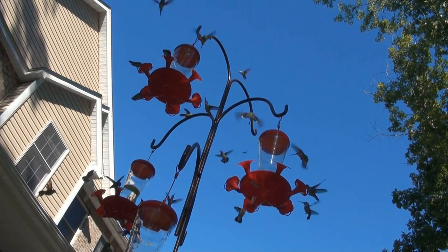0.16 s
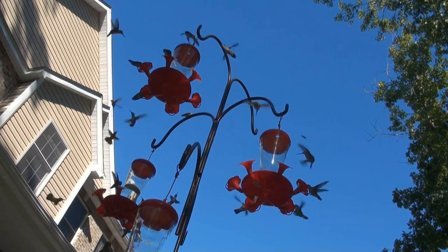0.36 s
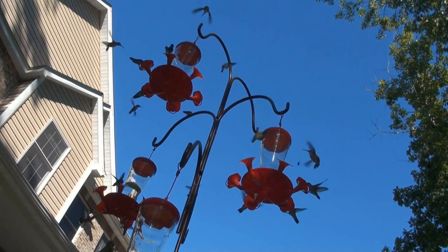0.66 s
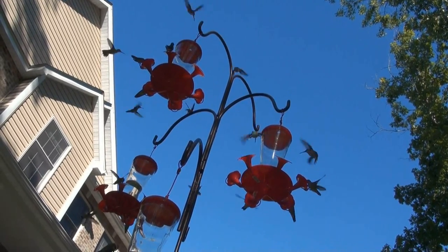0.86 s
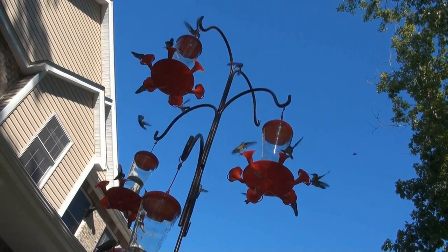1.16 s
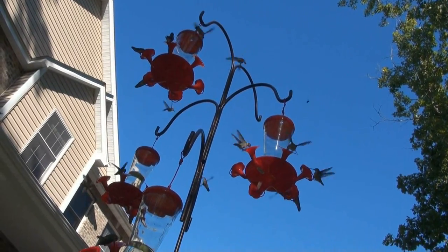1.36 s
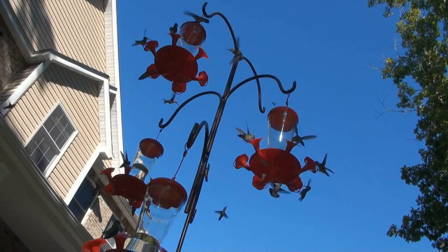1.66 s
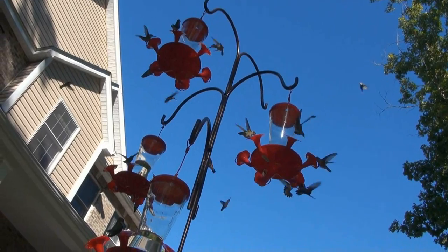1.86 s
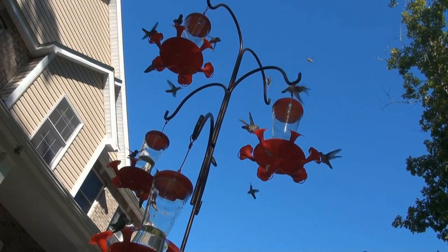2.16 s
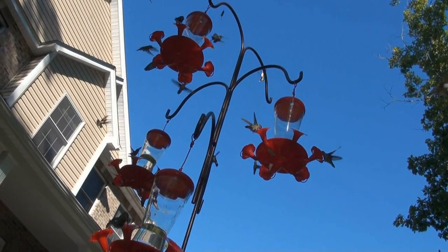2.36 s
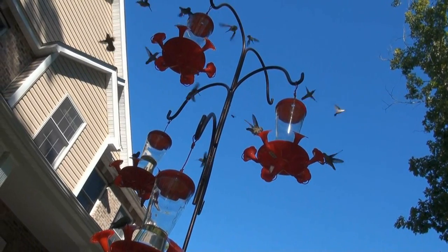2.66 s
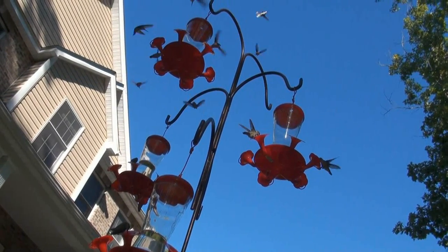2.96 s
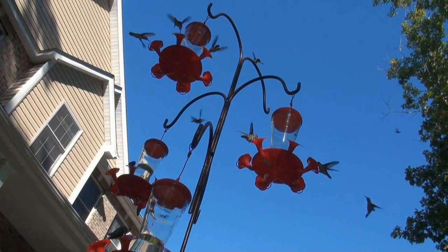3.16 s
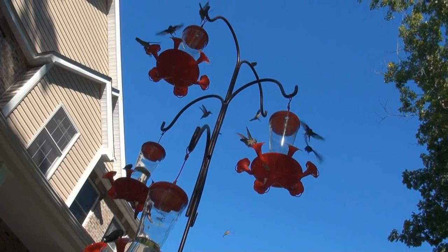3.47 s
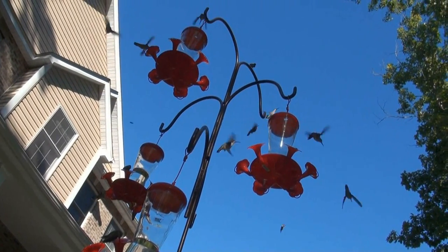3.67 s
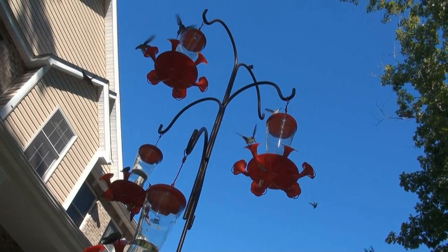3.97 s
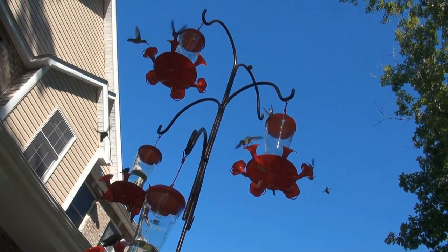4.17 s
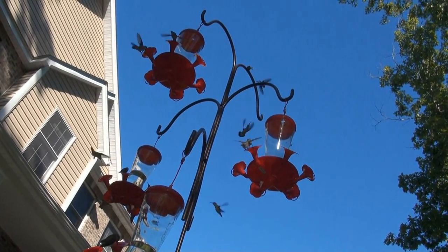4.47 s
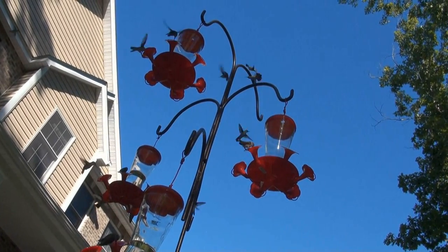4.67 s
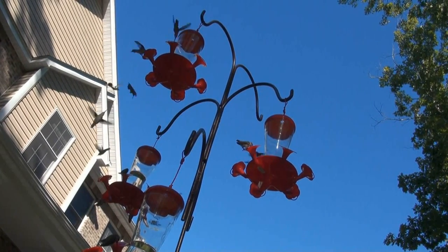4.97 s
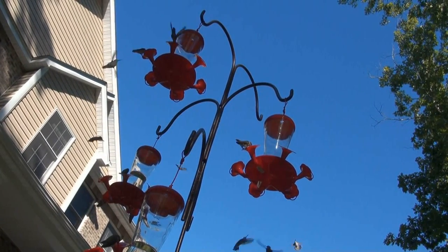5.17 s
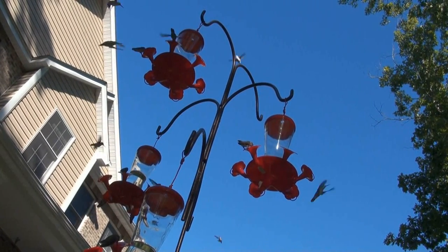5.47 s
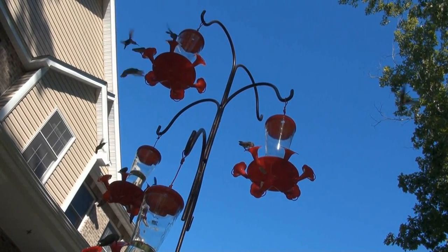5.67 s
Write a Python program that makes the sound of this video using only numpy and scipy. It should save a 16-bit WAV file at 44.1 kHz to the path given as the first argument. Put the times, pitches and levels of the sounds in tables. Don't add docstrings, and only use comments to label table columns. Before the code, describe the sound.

A crowd of hummingbirds flits around feeders outdoors near a house, heard by a stereo microphone a few metres below. Throughout, soft leafy hiss, a fine high insect shimmer and a low throbbing wing hum continue, with brief swells as birds whirr past. Small falling chips begin at once, with a thin whistle at 0.3 s and a short trill at 0.5 s. From 0.9 to 1.3 s whistles, a rapid bright trill and harsh buzzy rasps crowd together. Clear whistles return at 2.0-2.3 s, a sharp rasp at 2.5 s and the most piercing rising squeak at 2.75 s, among dry beak and feather ticks. Chips and short trills continue around 3 s; a faint far caw sounds at 3.35 s. Trills and whistles cluster at 3.7-4.2 s. Afterward calls thin: chips, small rasps, a trill at 4.7 s, a clear chip at 5.26 s, then mostly hum and insects until about 5.8 s.

```python
import sys
import numpy as np
from scipy import signal
from scipy.fft import rfft, irfft
from scipy.io import wavfile
from scipy.ndimage import uniform_filter1d

SR = 44100
rng = np.random.default_rng(int(sys.argv[2]) if len(sys.argv) > 2 else 0)


def store_pcm(level_fs):
    pcm = np.round(np.clip(level_fs, -1, 1) * 32767).astype(np.int16)
    wavfile.write(sys.argv[1], SR, np.atleast_2d(pcm).T)


def ratio_of_db(decibels):
    return 10 ** (np.asarray(decibels, float) / 20)


N = 256662

LEFT_LAG = 1
COARSE = 16
SIDES = np.array([[1], [-1]])


def level(x, db):
    return x * ratio_of_db(db) / np.sqrt(np.mean(x ** 2))


def colour(x, points):
    hz, db = np.transpose(points)
    bins_hz = np.arange(N // 2 + 1) * SR / N + 1
    gain = ratio_of_db(np.interp(np.log(bins_hz), np.log(hz), db))
    return irfft(rfft(x) * gain, N)


def ring(x, hz, width):
    return signal.lfilter(*signal.iirpeak(hz, hz / width, SR), x)


def muffle(x):
    return signal.sosfilt(signal.ellip(6, 1, 40, 13400, fs=SR, output="sos"), x)


def walk(rate, size=N):
    hold = int(SR / rate)
    steps = np.repeat(rng.standard_normal(size // hold + 1), hold)
    return 1.3 * uniform_filter1d(uniform_filter1d(steps, hold), hold)[:size]


def clock(length):
    return np.arange(int(length * SR)) / SR


def swell(t, rise, fall):
    return np.sin(np.pi / 2 * np.clip(np.minimum(t / rise, (t[-1] - t) / fall), 0, 1)) ** 2


def add(out, start, sound, pan_db):
    for side, sign in enumerate((1, -1)):
        i = int(start * SR) + LEFT_LAG * (side == 0)
        out[side, i:i + len(sound)] += sound * ratio_of_db(sign * pan_db / 2)


def air():
    # frequency in Hz, level in dB per Hz.
    hiss = [(30, 1), (65, -9), (300, -3), (650, -1.5), (2200, -7), (8000, -11), (12500, -11.5),
            (16000, -19.5)]
    # frequency in Hz, side minus middle in dB.
    hiss_width = [(40, -7), (120, -5), (400, 0), (1000, 2.5), (4000, 1), (10000, 1), (15000, -22)]
    mid = colour(rng.standard_normal(N), hiss) * ratio_of_db(0.12 * walk(4.35))
    side = colour(colour(rng.standard_normal(N), hiss), hiss_width) * ratio_of_db(0.27 * walk(2.4))
    return level(np.array([mid + side, mid - side]), -55)


def insects():
    # centre in Hz, width in Hz, level in dB.
    modes = [(7600, 500, -57), (7856, 220, -66), (7500, 1050, -69)]
    shared, pan_db = 0.5, -1
    common, left, right = rng.standard_normal((3, N))
    together = np.array([np.roll(common, LEFT_LAG), common])
    song = np.sqrt(shared) * together + np.sqrt(1 - shared) * np.array([left, right])
    scrapes = song * ratio_of_db(2.0 * walk(190) + 0.8 * walk(6))
    chorus = 0
    for hz, width, db in modes:
        width = 1.37 * width
        chorus = chorus + level(ring(ring(scrapes, hz, width), hz, width), db)
    return chorus * ratio_of_db(pan_db / 2 * SIDES)


def port_lag(k):
    return 1.25 / 2 * (1 - np.exp(-(k - 1) / 2.6)) * SIDES


def passes(t):
    # start in seconds, length in seconds, level in dB,
    # stroke tone in Hz (twice the beat rate).
    close_birds = [(0.019, 0.044, -47.5, 109), (0.105, 0.058, -49, 98.9), (0.19, 0.055, -49, 107.8),
                   (0.287, 0.099, -47.5, 105.2), (0.588, 0.26, -47, 105.2), (1.03, 0.11, -49, 103.6),
                   (1.344, 0.054, -48, 114.1), (1.599, 0.063, -46.5, 107), (1.988, 0.047, -47.5, 106.1),
                   (2.126, 0.056, -46, 104.1), (2.429, 0.031, -51, 106.6), (2.781, 0.045, -50, 96.4),
                   (2.857, 0.15, -48.5, 104.1), (3.045, 0.035, -48.5, 97.8), (3.14, 0.098, -48, 108.2),
                   (3.315, 0.04, -55, 103.5), (3.496, 0.08, -47, 107.1), (3.626, 0.029, -47, 110.3),
                   (3.688, 0.053, -43.5, 112), (3.832, 0.056, -44.5, 114.7), (3.938, 0.034, -50, 106.4),
                   (4.003, 0.055, -50, 96.6), (4.389, 0.076, -49, 101.8), (4.537, 0.032, -49, 99.9),
                   (4.63, 0.055, -46, 103.7), (4.84, 0.083, -49, 113.9), (5.02, 0.21, -47.5, 96.2),
                   (5.362, 0.07, -45.5, 109.9), (5.496, 0.088, -47.5, 94.6)]
    edge_s = 0.022
    s, length, db, tone_hz = np.transpose(close_birds)[:, :, None]
    glide_hz = np.interp(t, (s + length / 2)[:, 0], tone_hz[:, 0])
    stroke = 2 * np.pi * np.cumsum(glide_hz) * COARSE / SR
    inside = np.clip(np.minimum(t - s, s + length - t) / edge_s + 0.5, 0, 1)
    loudness = np.sum(ratio_of_db(db) * np.sin(np.pi / 2 * inside) ** 2, axis=0)
    return np.sqrt(2) * loudness * np.sin(stroke - port_lag(1.97))


def wings():
    harmonics_db = [-18.5, -3, -12, -9.5, -15, -12.5, -11.5, -9.5, -13.5, -18.5, -23]
    # time in seconds, level in dB.
    flock_levels = [(0.0, -56), (0.11, -58.5), (0.29, -52), (0.39, -57.5), (1.1, -55.5), (2.09, -59.5),
                    (2.12, -53.5), (2.35, -57.5), (3.65, -56), (3.68, -53.5), (4.18, -58.5), (4.94, -55.5),
                    (5.35, -58.5), (5.82, -59)]
    t = np.arange(N // COARSE + 1) * COARSE / SR
    near = passes(t)
    flock = 0
    for beat_hz in np.linspace(45, 59, 24):
        drift, nearness, place = (walk(rate * COARSE, len(t)) for rate in (4, 4, 1))
        turn = 2 * np.pi * np.cumsum(beat_hz * (1 + 0.03 * drift)) * COARSE / SR
        late = 2 * np.pi * beat_hz * 0.00004 * place * SIDES
        phases = rng.uniform(0, 2 * np.pi, len(harmonics_db))
        bird = 0
        for k, (db, phase) in enumerate(zip(harmonics_db, phases), 1):
            bird = bird + ratio_of_db(db) * np.sin(k * (turn + late) + phase - port_lag(k))
        flock = flock + bird * ratio_of_db(3.8 * nearness + 0.52 * place * SIDES)
    flock = level(flock, 4.16) * ratio_of_db(np.interp(t, *np.transpose(flock_levels)))
    hum = near * ratio_of_db(-2 - 0.4 * SIDES) + flock
    return signal.resample_poly(hum, COARSE, 1, axis=1)[:, :N]


def far_chips():
    count, low_db, high_db, scatter_db = 45, -74, -69, 2.5
    when, pitch, side = rng.random((count, 3)).T
    near = scatter_db * rng.standard_normal(count)
    return list(zip(0.02 + 5.7 * when, 1850 * 2 ** pitch, low_db + near, high_db + near, 16 * side - 10))


def chips(out):
    # start in seconds, start pitch
    # in Hz, fundamental in dB, overtones in dB, left minus right in dB.
    gentle = [(.734, 1924, -67.5, -62.5, 2), (1.062, 1940, -61.5, -58, -11), (1.403, 3545, -63, -51.5, -4),
              (1.466, 3620, -60, -55, -8), (2, 1910, -60, -61, 3), (2.1, 1897, -61.5, -62, -1.5),
              (2.776, 2650, -63, -51, 2), (3.102, 2650, -70, -57.5, -14), (3.168, 2640, -65, -55.5, -12),
              (5.552, 2023, -73, -66, -4), (5.661, 2290, -74, -67, -5)]
    plain = [(.262, 2645, -67, -60.5, 9), (.294, 1750, -64, -59, -4), (1.163, 1836, -61, -64, 6),
             (1.668, 2570, -64, -66, 4), (1.781, 1996, -59.5, -62, 4), (1.954, 2017, -62, -64.5, 7),
             (2.191, 2350, -63, -63, -9), (2.383, 2457, -62.5, -56.5, -10), (2.714, 2495, -64, -55, -7),
             (2.842, 2800, -65, -55, -6), (2.976, 2269, -55, -54, -8), (3.191, 2240, -63.5, -57.5, -9),
             (3.272, 2030, -60, -59, 3), (3.499, 2754, -57.5, -55, -12), (3.558, 2708, -58, -53, -13.5),
             (4.408, 2366, -54.5, -52.5, 7.5), (4.61, 1970, -63, -58, 2), (4.855, 1980, -65, -63, 3),
             (5.259, 2330, -53, -52, 3),
             (.012, 2345, -68, -63, 3), (.048, 2400, -70, -63, 2), (.166, 2050, -64, -70, 2),
             (.203, 2550, -66, -60.5, 4), (.343, 2400, -69, -70, 0), (.49, 2610, -67, -63, -3),
             (.653, 2100, -66, -68, 3), (1.033, 3400, -62, -60, -2), (1.494, 3040, -63, -63, -1),
             (1.51, 2710, -65, -66, -1), (1.612, 2600, -63, -62, 0), (1.869, 2900, -73, -68, -1),
             (3.312, 2510, -65, -61, -2), (3.688, 2600, -61, -64, -1), (4.437, 2395, -68, -65, -1),
             (4.476, 2310, -68, -72, 1), (4.512, 2300, -66, -64, 0), (5.047, 1910, -68, -72, 0)]
    steep = [(0.561, 1940, -62, -58.5, -3.5), (1.386, 2530, -61.5, -54, -7), (1.414, 3000, -66, -62, 3),
             (1.443, 2530, -62, -53.5, -8), (2.429, 3160, -69.5, -61, -4), (2.485, 2860, -74, -61, -7),
             (2.632, 3360, -58.5, -49.5, -3), (2.697, 3330, -58.5, -49.5, -3), (3.01, 3390, -66, -63, 6),
             (3.084, 3360, -68, -59.5, 15), (3.622, 2890, -58.5, -56, -13.5), (4.372, 2307, -60.5, -61, -2),
             (4.874, 2800, -62.5, -62.5, -4)]
    t = clock(0.021)
    breath = np.sqrt(2) * swell(t, 0.0013, 0.012)
    callers = [(0.805, gentle), (0.72, plain + far_chips()), (0.605, steep)]
    for fall, s, start_hz, low_db, high_db, pan_db in ((f, *row) for f, rows in callers for row in rows):
        hz = start_hz * fall ** ((t - 0.002) / 0.015)
        turn = 2 * np.pi * np.cumsum(hz * (1 + 0.021 * walk(1194.6, len(t)))) / SR
        husk = 1 + 0.4 * walk(3000, len(t))
        throat_hz = min(2.76 * start_hz, 7600)
        upper = 0
        for k in range(2, 8):
            off_peak_db = 14.3 * np.abs(np.log2(k * hz / throat_hz))
            treble_loss_db = 19 * np.clip(np.log2(k * hz / 11000), 0, 1)
            gain = ratio_of_db(high_db + 4 - off_peak_db - treble_loss_db)
            upper = upper + gain * (k * hz < SR / 2) * np.sin(k * turn)
        sound = ratio_of_db(low_db) * np.sin(turn) + muffle(husk * upper)
        add(out, s - 0.002, breath * sound, pan_db)


def pulses(t, hz, jitter, scatter_db):
    chance = rng.standard_normal((len(t) // 8, 2)).T
    at = (np.cumsum(1 + jitter * chance[0]) * SR / hz).astype(int)
    return np.bincount(np.clip(at, 0, len(t)), ratio_of_db(scatter_db * chance[1]))[:len(t)]


def rasps(out):
    # start in seconds, length in seconds, throat in Hz, level in dB, left minus right in dB.
    rasp_rows = [(0.107, 0.032, 5500, -59.5, 14), (0.372, 0.0335, 5500, -62.5, 12),
                 (0.62, 0.0375, 8150, -55, -7), (1.03, 0.12, 8600, -50.5, -6),
                 (1.226, 0.055, 7600, -47.5, 1), (1.226, 0.05, 3600, -61, 5), (1.294, 0.058, 7400, -48, -6),
                 (1.552, 0.027, 7200, -50, -7), (2.372, 0.097, 6650, -58, -4),
                 (2.539, 0.022, 8200, -42.5, -3), (2.545, 0.051, 7350, -45, -2.5),
                 (2.775, 0.018, 8500, -52, -6), (2.27, 0.07, 5500, -60, -2), (2.88, 0.05, 5000, -62, -3),
                 (3.55, 0.15, 2400, -64, -3), (2.992, 0.029, 7500, -50.5, -5),
                 (3.41, 0.036, 7130, -57, -10), (3.506, 0.017, 7000, -55, -5.5),
                 (3.431, 0.29, 3270, -62.5, -4.5), (3.902, 0.074, 3740, -59.5, -10),
                 (4.059, 0.24, 5940, -63.5, -9), (3.68, 0.022, 6020, -58, 0),
                 (3.77, 0.012, 5960, -55.5, -11), (4.079, 0.033, 7900, -57, -9),
                 (4.259, 0.06, 5400, -60, -11), (4.603, .032, 6920, -55.5, -12),
                 (4.735, 0.037, 6890, -54, -13)]
    for s, length, hz, db, pan_db in rasp_rows:
        t = clock(length + 0.018)
        buzz = pulses(t, 2600, 0.45, 2.7) * rng.choice([-1, 1], len(t))
        sizzle = ring(ring(buzz, 6340, 11000), 8200, 11800)
        early, late = ring(sizzle, 1.12 * hz, 2600), ring(sizzle, 0.95 * hz, 2600)
        slide = np.pi / 2 * t / t[-1]
        throat = early * np.cos(slide) + late * np.sin(slide)
        chest = level(ring(sizzle, 3250, 2100), -12.5)
        top = level(ring(sizzle, 12000, 2500), -17.5)
        sound = muffle(level(throat, 0.61) + chest + top + level(sizzle, -15.5))
        build = 0.24 * length
        onset = swell(t, 0.003 + build, 0.012 + build) * ratio_of_db(2.5 * walk(220, len(t)))
        add(out, s - 0.004, ratio_of_db(db) * sound * onset, pan_db)


def whistles(out):
    # start in seconds, length in seconds, first pitch in Hz, last pitch in Hz, level in dB.
    notes = [(0.275, 0.0646, 6900, 6680, -44.5), (.892, .09, 6380, 5500, -41),
             (2.059, 0.088, 6670, 6790, -40), (2.152, 0.118, 6810, 6910, -42.5),
             (2.731, .06, 6800, 6880, -47.5), (3.156, 0.096, 7010, 6570, -46.5),
             (3.932, 0.022, 6990, 6850, -43.5), (3.953, 0.082, 6980, 6670, -39),
             (4.177, 0.08, 6520, 6450, -58.5), (5.2, .068, 6500, 6220, -60), (5.329, .05, 6000, 5780, -66),
             (0.909, 0.065, 6550, 7000, -42.5), (.976, 0.035, 7150, 7120, -42),
             (1.011, 0.033, 7105, 7180, -39), (1.054, 0.051, 7280, 7200, -43.5),
             (2.267, .09, 7540, 7600, -40), (2.754, 0.0457, 7670, 8100, -34.5),
             (4.034, 0.058, 6410, 6750, -42.5), (4.09, 0.063, 6650, 6600, -54),
             (2.392, 0.081, 6700, 6500, -59), (2.562, 0.062, 5650, 5150, -58),
             (2.546, .048, 3900, 3300, -60), (1.3, .06, 6400, 7000, -51), (.335, .04, 6700, 6600, -57)]
    # octave overtone in dB, left minus right in dB, the same for
    # the overtone in dB, flutter from 0 to 1, fade from start to end in dB.
    voices = [(-16, -8, -12, 0.2, -4.5), (-3.5, -7, -8, 0.17, -8), (-13.5, -4.3, -22, 0, 2.5),
              (-26, -2, -18, .3, -16), (-10, -9.5, -12, 0.41, -3), (-6.5, -11, -12, 0, -6),
              (-21, -12, -9, 0.5, -5), (-9, -10, -9, 0.36, -10), (-23, -9, -7, 0.95, -4),
              (-12, 1.5, 2, .4, 0), (-25, 2, 3, 1, -3), (-13, 4, 7, 0.27, -3.5), (-30, 5, 7, 0.4, -4),
              (-30, 6, 9, 0.1, 2), (-30, 3, 4, 0.7, -5.5), (-22, .5, 1, .33, -11.5),
              (-17, 4.5, 7, 0.13, -3), (-10, -6, -5, 0.2, -3), (-14, -6, -6, .8, -4), (-30, -4, -4, .9, -4),
              (-30, -3, -3, .7, -5), (-30, 0, 0, 0.83, -4), (-30, 3, 3, .9, -6), (-30, -4, -6, .8, -7)]
    bend = 1.41
    for (s, length, first_hz, last_hz, db), voice in zip(notes, voices):
        octave_db, pan_db, octave_pan_db, flutter, fade_db = voice
        t = clock(length)
        along = t / length
        glide = along ** bend if last_hz < first_hz else 1 - (1 - along) ** bend
        hz = (first_hz + (last_hz - first_hz) * glide) * (1 + 0.0063 * walk(149, len(t)))
        turn = 2 * np.pi * np.cumsum(hz) / SR
        breath = ratio_of_db(db + fade_db * along + 6.2 * flutter * walk(232, len(t)))
        breath = breath * swell(t, 0.0081, 0.0047)
        octave_breath = breath * (breath / breath.max()) ** 0.9 * ratio_of_db(octave_db)
        add(out, s, np.sqrt(2) * breath * np.sin(turn), pan_db)
        add(out, s, np.sqrt(2) * octave_breath * np.sin(2 * turn), octave_pan_db)


def trill_notes():
    # first note in seconds, last note in seconds, number of notes.
    timings = [(.319, .319, 1), (.4632, .5137, 5), (.984, .998, 2), (1.0135, 1.1164, 10), (1.177, 1.191, 2),
               (2.9452, 2.9841, 4), (3.3288, 3.383, 5), (3.716, 3.7677, 5), (3.8524, 3.9414, 7),
               (4.7242, 4.7744, 5), (1.128, 1.164, 4), (4.088, 4.102, 2), (4.186, 4.243, 5)]
    # loudest note in dB, its place from 0 to 1, weakening away from it
    # in dB, top of the arches in Hz, pitch change in Hz.
    tunes = [(-40.5, 0, 0, 6350, 0), (-38.5, .7, 13, 6370, 250), (-42.5, 0, 0, 5760, 0),
             (-35, 0.6, 13, 6080, -350), (-36.5, 0.4, -3, 7430, -340), (-41.5, 0.4, 9, 6250, 100),
             (-38.5, 0.4, 11, 6300, -600), (-41, 0.12, 11, 5800, -700), (-38, 0.4, 16, 5950, -300),
             (-43, 0.46, 6, 5950, -500), (-46, 0.1, 4, 6100, 0), (-49, .5, 0, 6400, 0),
             (-52, .5, 3, 6300, -200)]
    # left minus right in dB, arch depth as a share, slowing toward the
    # end as a share, depth of the closing drop as a share, weakness of the first note in dB.
    voices = [(-5.5, .35, 0, .1, 0), (-5.5, .25, 0, .15, 3), (-4, .5, 0, .3, 0), (-4, .97, 0, .5, 4),
              (-7, .8, 0, .25, 0), (-8, .6, 0, .25, 5), (-2, .7, .03, .25, 3), (-9.5, .9, -.1, .15, 0),
              (-9.5, .98, .17, .15, 8), (-4, .6, .06, .25, 0), (-4, .8, 0, .4, 0), (-6, .7, 0, .3, 0),
              (-8, .8, 0, .3, 0)]
    for (first, last, count), tune, voice in zip(timings, tunes, voices):
        db, place, weaker_db, hz, change_hz = tune
        pan_db, depth, slowing, drop, shy_db = voice
        for u in np.linspace(0, 1, count):
            s = first + (last - first) * u * (1 - slowing * (1 - u))
            note_db = db - weaker_db * abs(u - place) - shy_db * (u == 0)
            yield s, note_db, hz + change_hz * (u - 0.5), pan_db, depth, drop


def trills(out):
    t = clock(0.012)
    rise, fall = 0.45 * np.exp(-t / 0.0017), np.exp((t - t[-1]) / 0.0015)
    for s, db, hz, pan_db, depth, drop in trill_notes():
        arch_hz = 1.02 * hz * (1 - depth * rise - drop * fall)
        turn = 2 * np.pi * np.cumsum(arch_hz * (1 + 0.015 * walk(970, len(t)))) / SR
        puff = muffle(ring(rng.standard_normal(len(t)), 8800, 6600))
        puff = puff * (np.exp(-t / 0.003) + drop * fall)
        breath = ratio_of_db(db - 5) * swell(t, 0.0015, 0.003)
        octave = ratio_of_db(-4 - 900 * t) * (hz < 7000) * np.sin(2 * turn)
        add(out, s - 0.0012, breath * (np.sin(turn) + ratio_of_db(5.5) * puff), pan_db)
        add(out, s - 0.0012, breath * octave, 1.5 * pan_db)


def taps(out):
    # start in seconds, peak in dB, centre in Hz, left minus right in dB.
    tap_rows = [(0.9684, -33, 7140, 2.0), (1.929, -31, 11500, -4.0), (2.1464, -33, 6830, -3.0),
                (2.7994, -36, 8040, 1.0), (3.4725, -40, 4500, -3.5), (3.5114, -33, 5500, -5.0),
                (3.7084, -38, 7890, -7.0), (2.281, -41, 9000, -2), (2.328, -41, 8000, -2),
                (2.3715, -42, 11000, -4.5), (2.8225, -39, 11000, 0), (3.5473, -42, 11000, -2.5),
                (3.688, -42, 9000, -4), (4.076, -39, 11500, -8), (4.256, -43, 11000, -8),
                (5.428, -47, 11000, 1)]
    t = clock(0.0068)
    for s, db, hz, pan_db in tap_rows:
        tick = ring(rng.standard_normal(len(t)) * np.exp(-t / 0.0031), hz, 0.57 * hz)
        add(out, s, ratio_of_db(db - 3) * tick / np.abs(tick).max(), pan_db)


def caw(out):
    # resonance in Hz, width in Hz, level in dB.
    resonances = [(2680, 900, 3.5), (4090, 500, 4), (5500, 840, 1)]
    start_s, length_s, pulse_hz, db, pan_db = 3.345, 0.105, 250, -53, -5
    t = clock(length_s)
    buzz = pulses(t, pulse_hz, 0.0995, 2.34) + 0.086 * rng.standard_normal(len(t))
    throat = sum(level(ring(buzz, hz, width), gain_db) for hz, width, gain_db in resonances)
    add(out, start_s, level(throat, db) * swell(t, 0.01, 0.015), pan_db)


def echo(calls):
    echo_db, t60_s = -6, 0.22
    t = clock(0.44)
    tail = rng.standard_normal((2, len(t))) * ratio_of_db(-60 * t / t60_s) * (t > 0.006)
    tail *= ratio_of_db(echo_db) / np.sqrt(np.sum(tail ** 2, axis=1, keepdims=True))
    return signal.fftconvolve(calls.mean(axis=0, keepdims=True), tail, axes=1)[:, :N]


def scene():
    calls = np.zeros((2, N))
    for voice in (chips, rasps, whistles, trills, taps, caw):
        voice(calls)
    return calls + echo(calls) + air() + insects() + wings()


def top_cut(x):
    return signal.sosfilt(signal.butter(12, 15860, fs=SR, output="sos"), x)


def record(dry):
    dip_hz, width_hz, share = 9830, 1560, 0.4
    heard = dry - share * ring(dry, dip_hz, width_hz)
    return top_cut(heard)


dry = scene()
out = record(dry)
store_pcm(out)
```